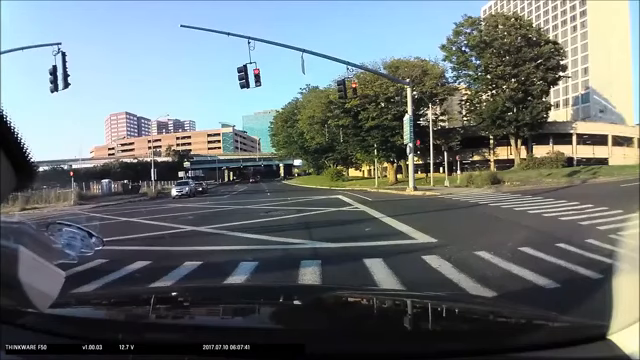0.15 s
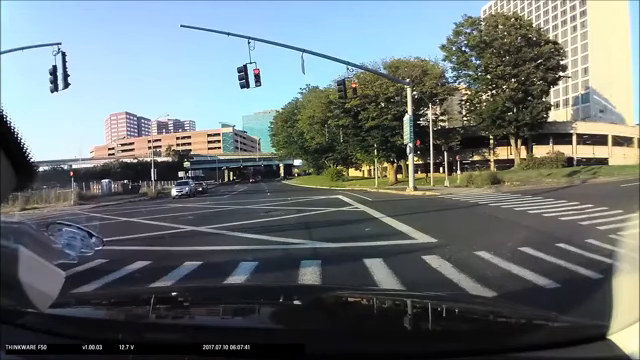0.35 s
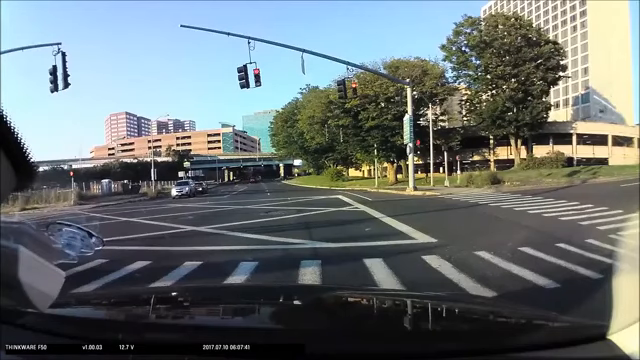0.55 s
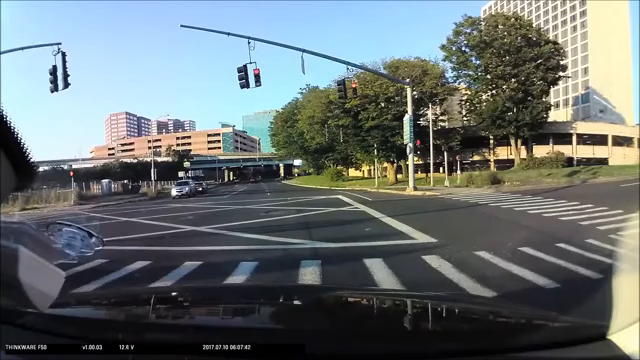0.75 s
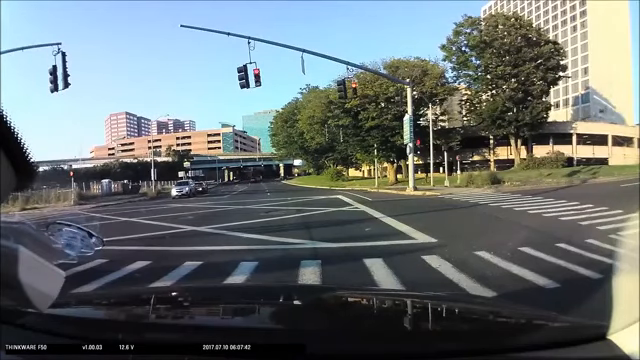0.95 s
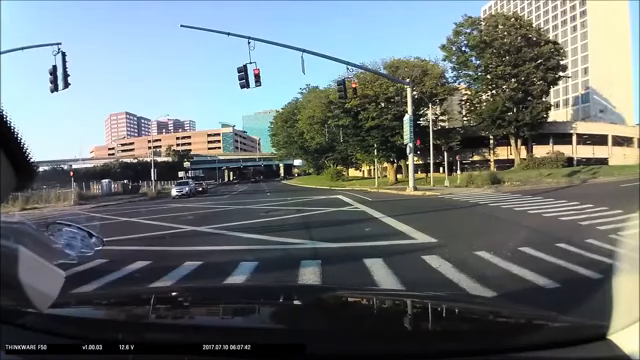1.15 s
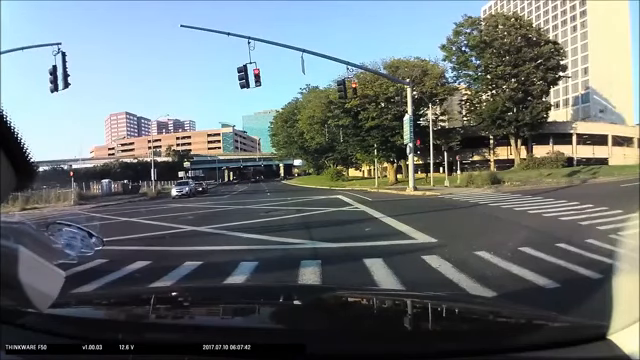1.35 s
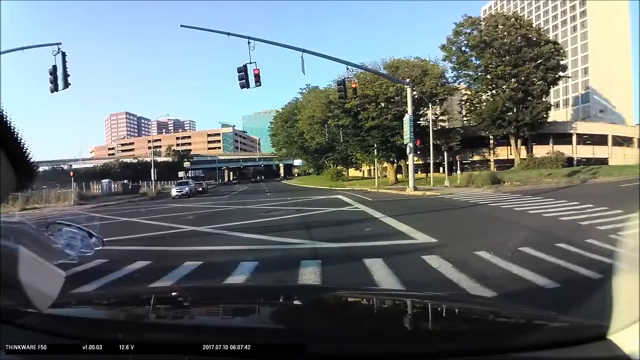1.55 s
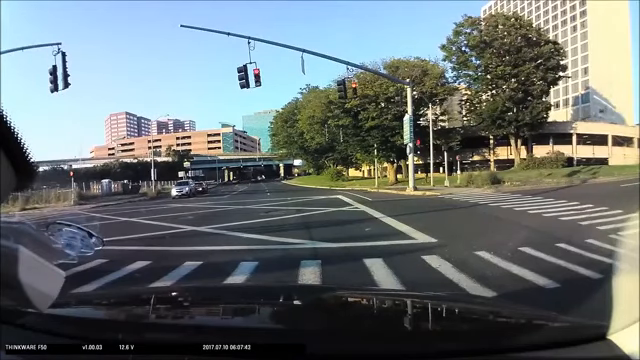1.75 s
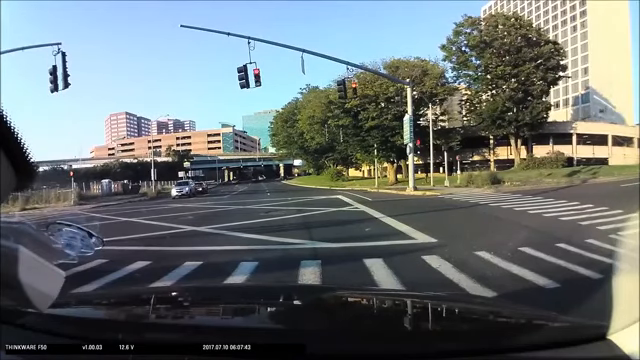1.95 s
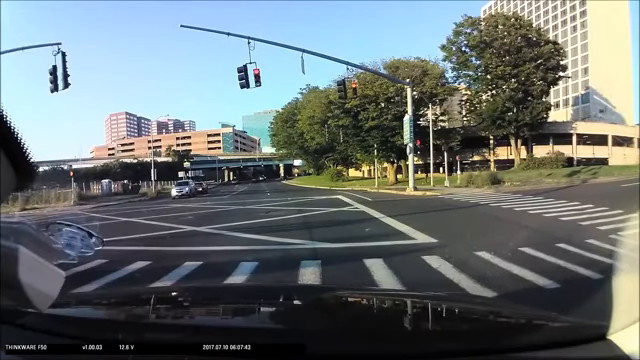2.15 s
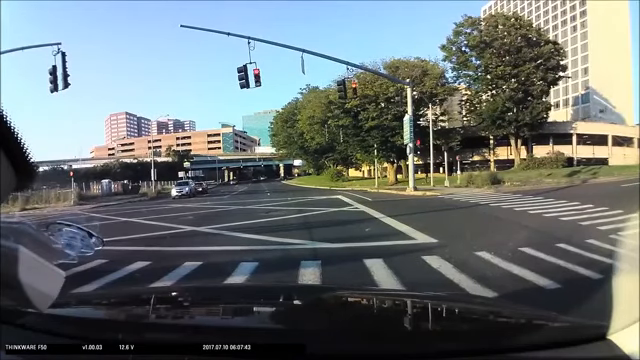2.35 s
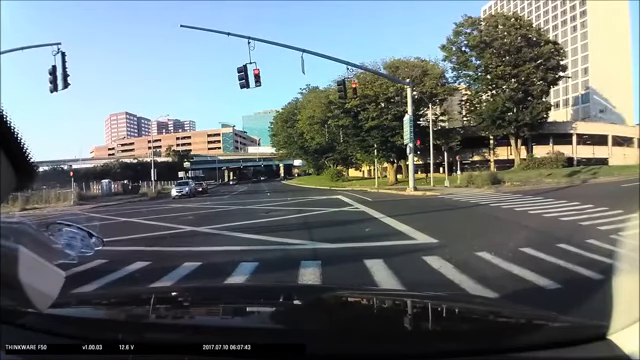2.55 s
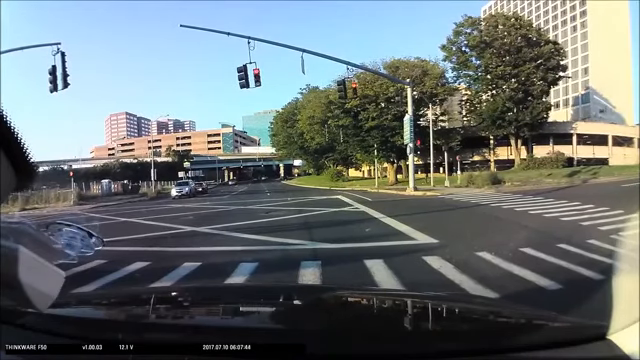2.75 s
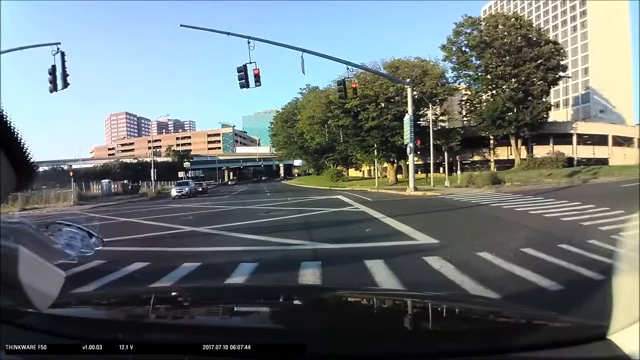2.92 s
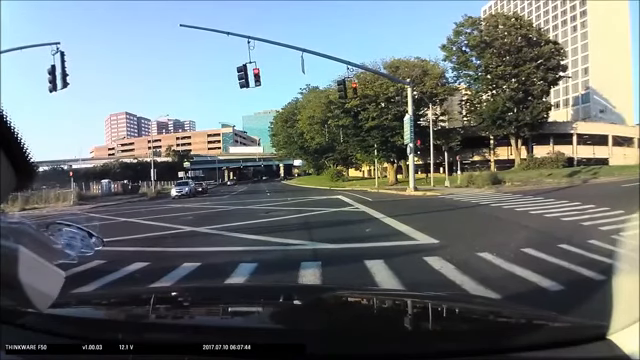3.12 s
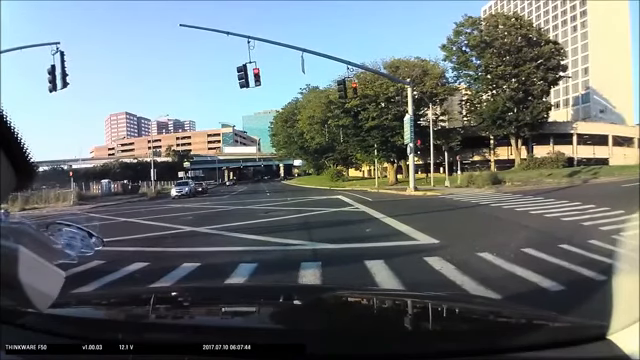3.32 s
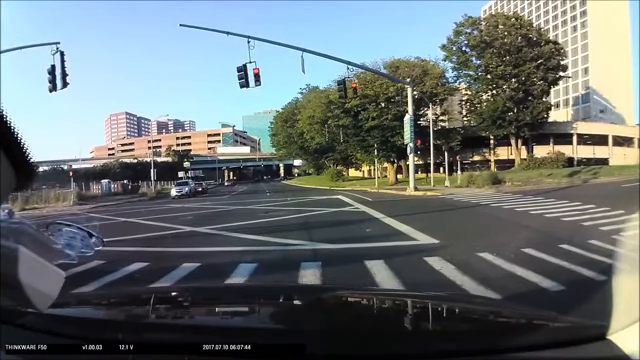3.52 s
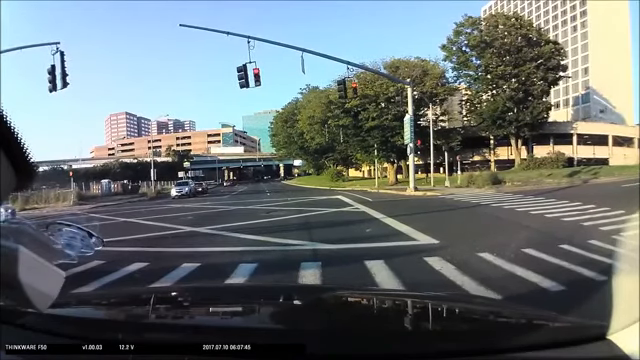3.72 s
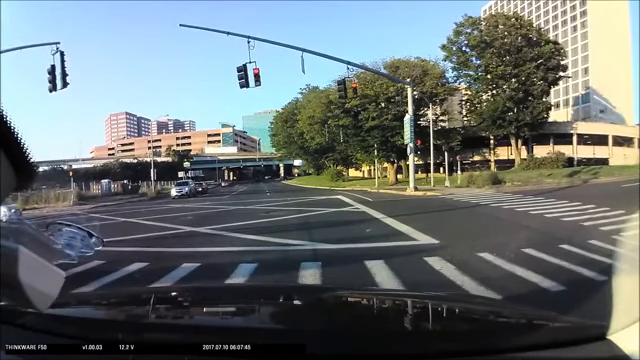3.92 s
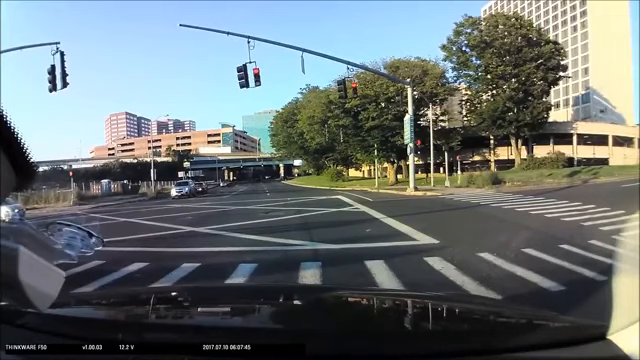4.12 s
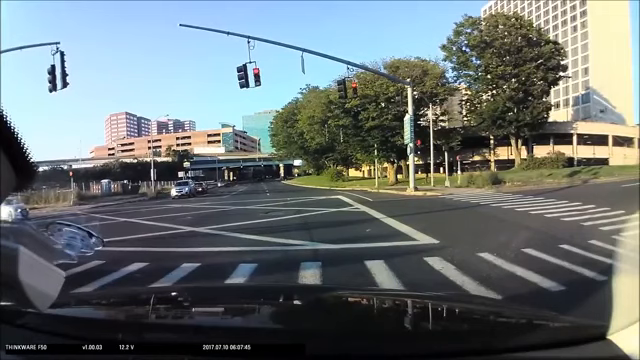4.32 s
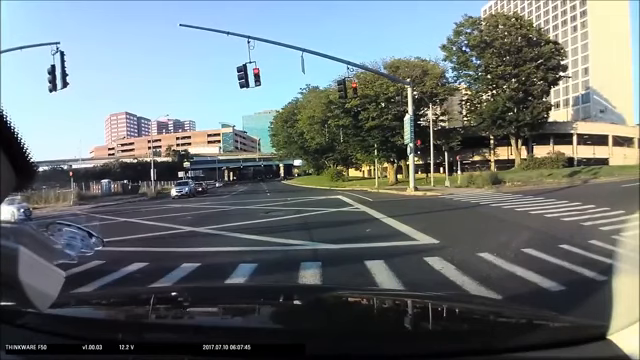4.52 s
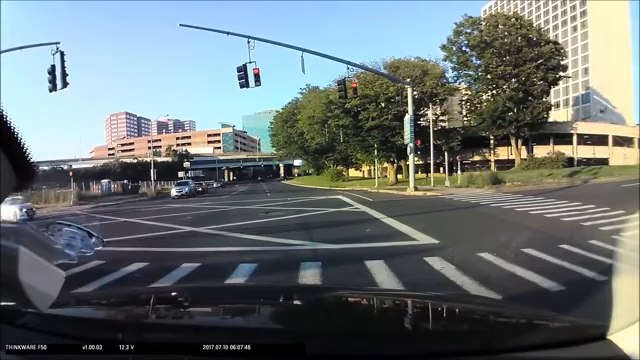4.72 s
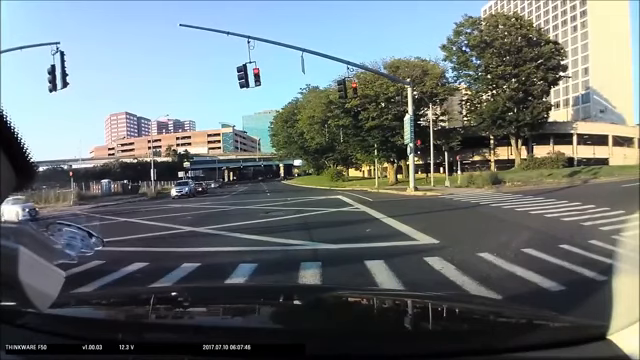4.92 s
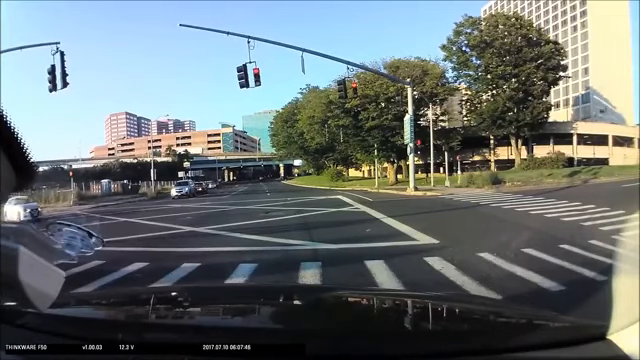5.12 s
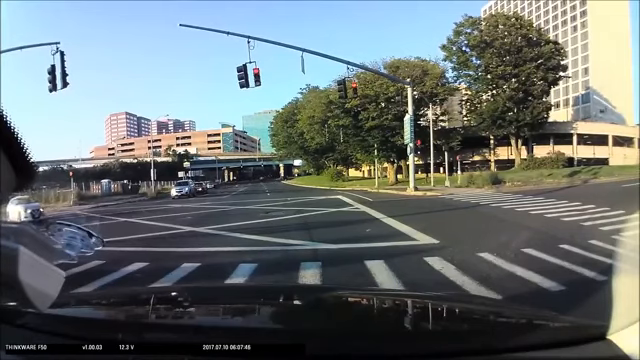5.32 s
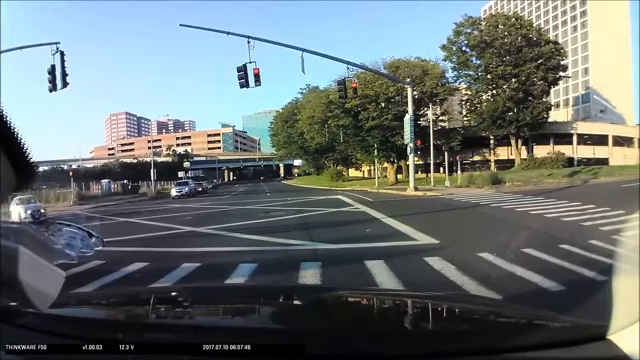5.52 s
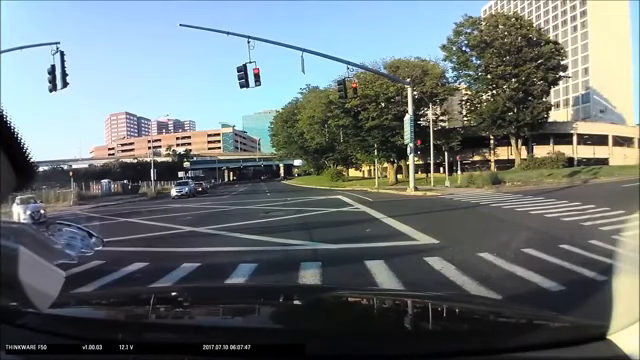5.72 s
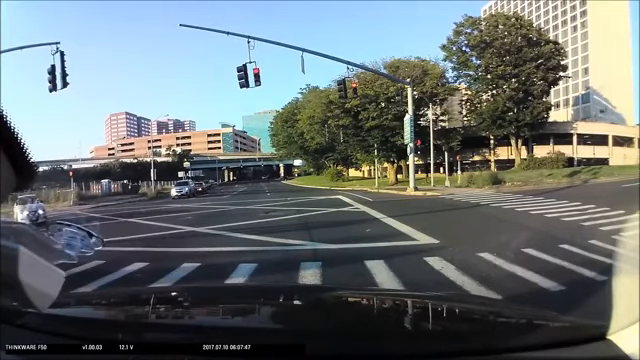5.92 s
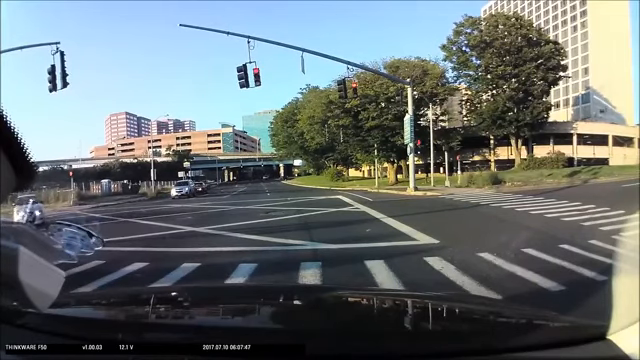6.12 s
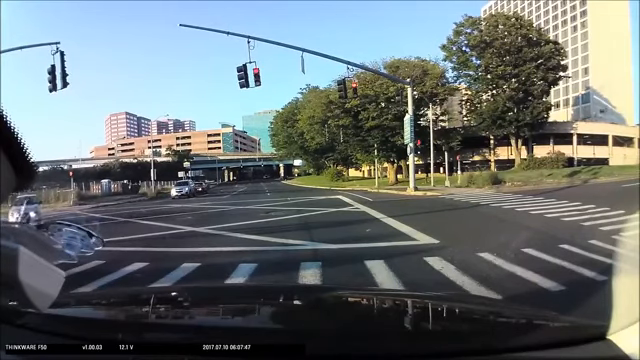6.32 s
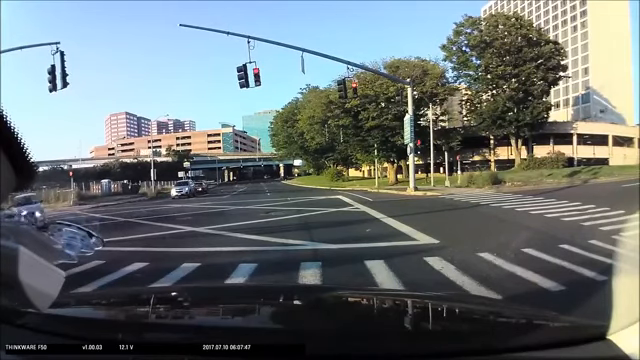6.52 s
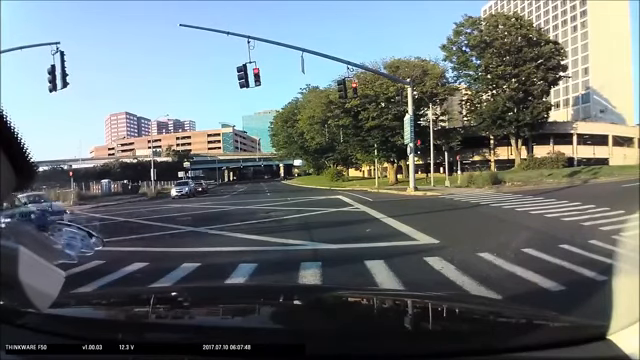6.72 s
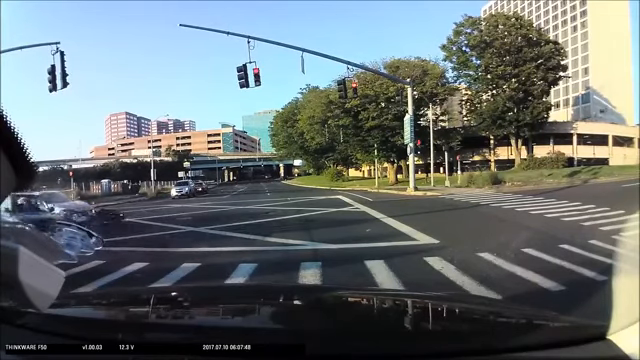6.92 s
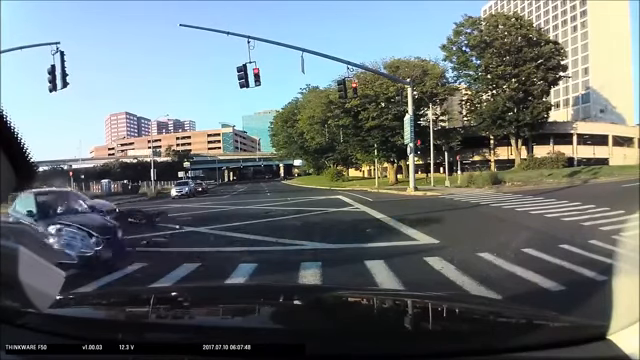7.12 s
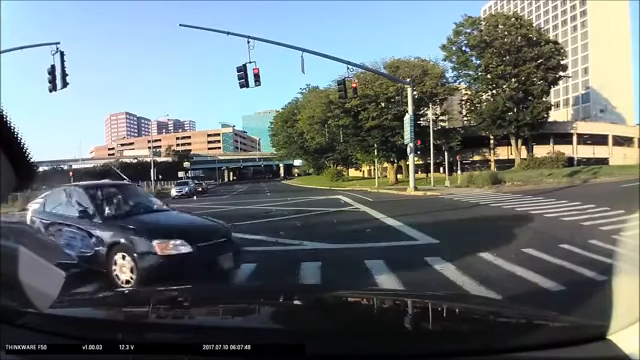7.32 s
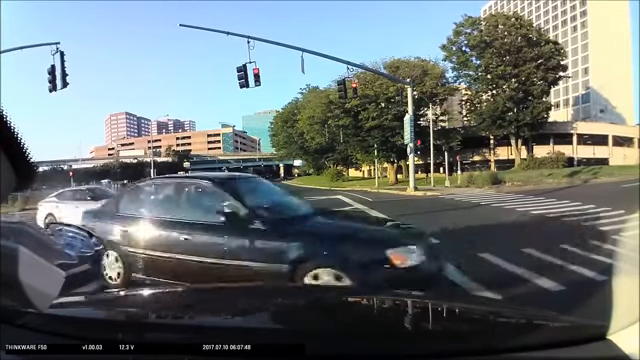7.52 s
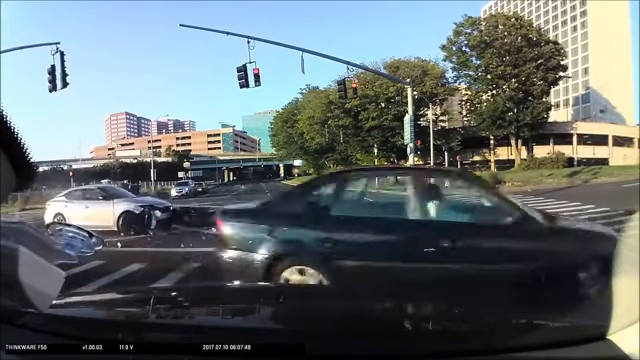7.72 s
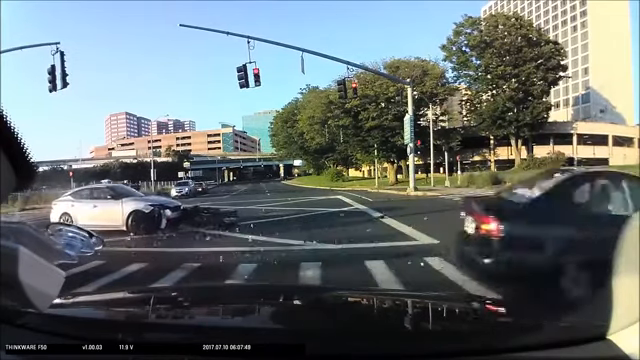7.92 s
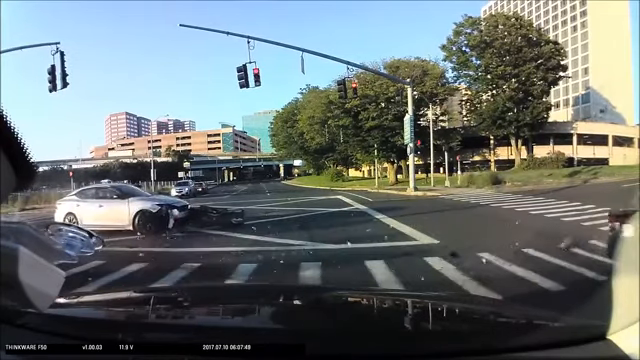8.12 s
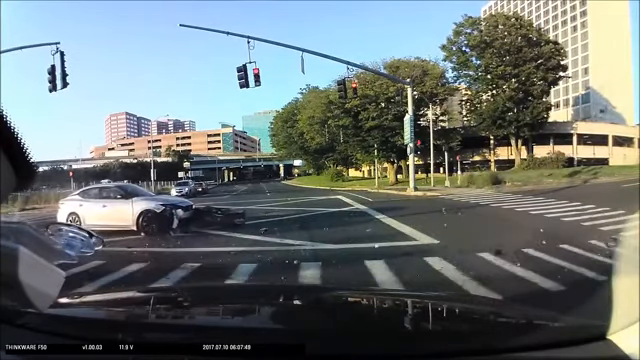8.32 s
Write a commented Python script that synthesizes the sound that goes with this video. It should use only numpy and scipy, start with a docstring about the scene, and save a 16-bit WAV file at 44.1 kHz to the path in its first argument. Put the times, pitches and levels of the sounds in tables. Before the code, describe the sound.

A car idles, heard from inside, until two cars crash just outside with squealing tyres, showering debris and a second crash.

```python
"""A crash heard from a waiting car

A car idles at a junction: its engine thumps, a fan blows, switches and the indicator tick.
Two cars collide just outside, crushing metal and plastic. One skids past on squealing tyres,
showers the windscreen with debris, jolts the waiting car and crashes again farther on.
A camera on the windscreen hears it all, coloured by the ringing of the glass and the cabin."""
import sys
import numpy as np
from scipy import signal
from scipy.fft import rfft, irfft, next_fast_len
from scipy.io import wavfile
from scipy.ndimage import map_coordinates

SR = 44100
rng = np.random.default_rng(int(sys.argv[2]) if len(sys.argv) > 2 else 0)


def pcm_store(signal):
    """Save signal as 16-bit PCM."""
    levels = np.round(np.clip(np.atleast_2d(signal), -1, 1) * 32767)
    wavfile.write(sys.argv[1], SR, levels.astype(np.int16).T)


N = 373086


def amp(db):
    """Turn decibels into a gain."""
    return 10 ** (np.asarray(db) / 20)


def unit(x):
    """Scale a sound to an average strength (rms) of 1."""
    return x / np.sqrt(np.mean(x ** 2) + 1e-20)


def clock():
    """The time of every sample, in seconds."""
    return np.arange(N) / SR


def curve(rows):
    """Join (time_s, value) points with straight lines."""
    return np.interp(clock(), *np.transpose(rows))


def wobble(rate):
    """A smooth random curve through `rate` new values a second."""
    values = rng.standard_normal(int(N * rate / SR) + 4)
    steps = np.arange(0, N, 8)
    return np.interp(np.arange(N), steps, map_coordinates(values, [steps * rate / SR]))


def swell(start_s, rise_s, hold_s, fall_db_per_s):
    """A gain that rises to 1, holds and dies away."""
    t = clock() - start_s
    return np.clip(t / rise_s, 0, 1) * amp(-fall_db_per_s * np.maximum(t - rise_s - hold_s, 0))


def drive_by(nearest_s, width_s):
    """A passing car is louder the nearer it is: a gain of 1 at its closest."""
    return 1 / np.hypot(1, (clock() - nearest_s) / width_s)


def tone(hz):
    """A pure tone that follows a pitch curve."""
    return np.sqrt(2) * np.sin(2 * np.pi * np.cumsum(hz) / SR)


def fuzzy_tone(hz, width_hz):
    """A narrow band of noise around one pitch."""
    phase = 2 * np.pi * hz * clock()
    return unit(wobble(width_hz) * np.sin(phase) + wobble(width_hz) * np.cos(phase))


def ring(modes, t):
    """An object struck at t = 0 rings; fade_s is always the time to fall by 60 dB."""
    t = np.maximum(t, 0)
    return sum(amp(db - 60 * t / fade_s) * np.sin(2 * np.pi * hz * t) for hz, db, fade_s in modes)


def grains(per_s, spread_db):
    """Tiny random clicks of uneven size."""
    size = amp(spread_db * np.clip(rng.standard_normal(N), -2, 2)) * rng.choice([-1, 1], N)
    return unit(size * (rng.random(N) < per_s / SR))


# pitches that the windscreen and cabin strengthen: pitch_hz, width_hz, boost_db
GLASS = [(259, 30, 4.5), (601, 50, 5), (890, 68, 4), (1660, 150, 7), (2626, 72, 5.5), (2872, 116, 5.5),
         (3084, 270, 7)]

def coloured(x, colour, glass=True):
    """Filter x by a colour (how strong each pitch is next to the others), and by the glass if asked."""
    size = 2 * next_fast_len((N + SR // 2) // 2)
    hz = np.fft.rfftfreq(size, 1 / SR)
    points_hz, points_db = np.transpose(colour)
    octave, points = np.log2(hz + 1), np.log2(points_hz)
    octaves_outside = abs(octave - np.clip(octave, points[0], points[-1]))
    db = np.interp(octave, points, points_db) - 24 * octaves_outside
    if glass:
        db += sum(boost / (1 + (2 * (hz - pitch) / width) ** 2) for pitch, width, boost in GLASS)
    # build the filter so that it rings after a hit, never before
    cepstrum = irfft(np.log(amp(db) + 1e-6))
    response = np.exp(rfft(2 * cepstrum[:size // 2], size) - cepstrum[0])
    return irfft(rfft(x, size) * response, size)[:N]


def noise(colour, glass=True):
    """Coloured noise of strength 1."""
    return unit(coloured(rng.standard_normal(N), colour, glass))


def clacks(hits, colour):
    """Hard hits, each a burst of noise that dies quickly."""
    t = clock()
    level = sum((t >= s) * amp(db - 60 * np.maximum(t - s, 0) / fade_s) for s, db, fade_s in hits)
    return level * noise(colour)


# colour of the microphone's hiss: pitch_hz, level_db
HISS = [(3500, -5.5), (5000, -10.5), (5700, -8.5), (6100, -3.5), (7200, 0), (8000, -7), (9000, 1),
        (10000, -1.5), (11100, 2.5), (11700, -9.5), (12500, -5.5), (13200, -10), (15000, -10)]
# steady electronic tones: pitch_hz, level_db
TONES = [(6002, -91), (6998, -88), (9001, -91), (10002, -89), (10998, -84)]
# path of a thin whine: time_s, pitch_hz
WHINE = [(0, 14000), (1.78, 13750), (2.1, 13450), (3.45, 13430), (4.2, 13900), (4.27, 13430)]

def electronics():
    """The camera's own circuits hiss and whine faintly."""
    tones = sum(amp(db) * tone(np.full(N, hz)) for hz, db in TONES)
    whine = amp(-86) * tone(curve(WHINE) + 18 * wobble(60))
    return amp(-70.5) * noise(HISS, glass=False) + tones + whine


# colour of the air in the cabin: pitch_hz, level_db
CABIN = [(20, -12), (60, 4), (130, -4), (200, -10), (280, -1), (400, -17.5), (700, -24), (1400, -26.5),
         (2100, -35.5), (3000, -34.5), (3800, -56)]
# bands of a faint whistle: pitch_hz, width_hz, relative_db
WHISTLE = [(1640, 200, 0), (2700, 150, -7.5)]

def cabin_air():
    """A steady hush fills the cabin, with a brief wavering whistle near the start."""
    bands = sum(amp(db) * fuzzy_tone(hz, width) for hz, width, db in WHISTLE)
    hush = amp(-52) * noise(CABIN, glass=False)
    whistling = swell(.18, rise_s=.35, hold_s=.75, fall_db_per_s=48)
    return hush + amp(-65.5 + 2.5 * wobble(11.6)) * whistling * bands


# colours of the fan's rumble and of air in the vents: pitch_hz, level_db
RUMBLE = [(11, -37.5), (18, 4), (39, -4.5), (113, -14), (155, -20.5), (197, -10.5), (299, -30), (329, -32),
          (500, -55), (650, -55), (1100, -120)]
VENT_RUSH = [(250, 0.5), (450, 3.5), (750, -4.5), (1200, -19), (2000, -27), (5000, -29.5)]
# puffs as the vents open: start_s, level_db
PUFFS = [(1.79, -63), (2.04, -61)]

def fan():
    """A low rumble swells as the fan pushes air through the vents."""
    blowing = swell(1.725, rise_s=.089, hold_s=2.68, fall_db_per_s=15)
    puffs = sum(amp(db) * swell(s, rise_s=.03, hold_s=.038, fall_db_per_s=55) for s, db in PUFFS)
    rumble = (amp(-51) + amp(-37) * blowing) * noise(RUMBLE, glass=False)
    rush = (amp(-72) * blowing + puffs) * noise(VENT_RUSH, glass=False)
    return rumble + rush


# colour of tyres heard through closed windows: pitch_hz, level_db
STREET = [(300, -5), (700, -7), (1000, 1), (1500, -4), (2000, -9.5), (2900, -5), (3300, -5.5), (3800, -31),
          (6000, -29)]

def traffic(distant_db=-74, nearest_db=-57):
    """Tyres hum far away while one car draws near on the cross street."""
    approach = amp(nearest_db) * drive_by(nearest_s=6.66, width_s=.49)
    return np.hypot(amp(distant_db), approach) * noise(STREET)


# deep notes: start_s, length_s, first_hz, last_hz, level_db
DRONES = [(1.802, 0.19, 55.9, 47.1, -35), (2.018, 1.06, 26, 33.92, -31), (3.54, 0.65, 55.7, 55.5, -41.5),
          (4.384, 0.38, 47.7, 42.1, -45.5), (4.424, .22, 109.5, 107.2, -45.5),
          (7.977, 0.14, 30.24, 30, -27)]

def drone(rise_s=.079, waver_db=1.5):
    """A deep drone comes and goes, each note sliding a little in pitch."""
    drift = 1 + .0401 * wobble(14)
    notes = np.zeros(N)
    for s, length_s, first_hz, last_hz, db in DRONES:
        hz = np.interp(clock(), [s, s + length_s], [first_hz, last_hz]) * drift
        notes += amp(db) * swell(s, rise_s, length_s - rise_s, fall_db_per_s=130) * tone(hz)
    return amp(waver_db * wobble(8.2)) * notes


# engine speed: time_s, turns_per_minute
IDLE = [(0.0, 715.3), (1.4, 719.3), (2.0, 708.2), (2.9, 711.2), (3.4, 723.3), (4.8, 720.9), (5.5, 713.1),
        (8.46, 711.6)]
# when each cylinder fires: fraction_of_cycle, relative_db
CYLINDERS = [(0.182, -10), (.475, -3), (0.702, -8), (.985, -8.5)]
# dashboard buzz after a firing: pitch_hz, relative_db, peak_s
DASHBOARD = [(197.9, -33, .019), (209.7, -38.5, 0.011), (256.5, -43, 0.019), (330.5, -51, 0.034),
             (427, -72, 0.032)]
# body boom after a firing: pitch_hz, relative_db, fade_s
BODY_BOOM = [(24, -70, 0.13), (51.4, -37.5, 0.13), (72, -45, 0.092), (106.2, -39.5, 0.14)]

def engine(scatter_db=2.26, boom_lead_s=.01144):
    """Four uneven cylinders thump the car's body and set the dashboard buzzing."""
    cycles = np.cumsum(curve(IDLE)) / (120 * SR)  # one cycle is two turns
    firings = np.zeros(N)
    for place, db in CYLINDERS:
        at = np.flatnonzero(np.diff(np.floor(cycles - place)))
        firings[at] += amp(db + scatter_db * rng.standard_normal(len(at)))
    t = np.arange(SR // 3) / SR
    # the panels take a moment to swell
    buzz = sum(amp(db) * (t / peak_s * np.exp(1 - t / peak_s)) ** 3 * np.sin(2 * np.pi * hz * t)
               for hz, db, peak_s in DASHBOARD)
    # the body feels each firing a little earlier, and more evenly
    thumps = np.roll(np.sqrt(firings), -int(boom_lead_s * SR))
    return signal.fftconvolve(firings, buzz)[:N] + signal.fftconvolve(thumps, ring(BODY_BOOM, t))[:N]


# switch clicks and thinner, brighter snaps: start_s, relative_db, fade_s
CLICKS = [(1.812, -49, 0.21), (1.978, -54.5, 0.25), (2.059, -60, 0.16), (4.176, -41, 0.092),
          (4.255, -54, 0.09)]
SNAPS = [(1.8, -49, .025), (2.26, -58, .03)]
# colours of hard plastic and of bright hits on glass, shared with the debris: pitch_hz, level_db
PLASTIC = [(200, 0), (500, 15), (1400, 3), (2500, -3.5), (3200, 1), (4000, -10.5), (5000, -5.5),
           (6500, -16), (12000, -59)]
SHARDS = [(300, 3), (700, 1.5), (1600, 5.5), (2200, -3.5), (3100, -1), (4200, -4), (6000, -6.5),
          (8000, -16.5), (11000, -12.5), (13000, -27), (15000, -42)]

def switches():
    """Hard plastic switches click and snap in the cabin."""
    return amp(-3) * (clacks(CLICKS, PLASTIC) + clacks(SNAPS, SHARDS))


# ticks of the indicator's relay, an electric switch: start_s, relative_db, fade_s
RELAY_TICKS = [(4.4653, -49, 0.12), (4.8693, -49, 0.1), (5.263, -47.5, 0.38), (5.661, -45.5, 0.072)]
# colour of a tick: pitch_hz, level_db
RELAY_COLOUR = [(500, -3), (1200, -2.5), (1550, 4), (2300, -14), (3200, -14), (4000, -18), (5300, -13),
                (6300, -18), (9000, -32)]
# ringing of the relay's frame: pitch_hz, relative_db, fade_s
RELAY_FRAME = [(1550, -16, 0.1), (3110, -10, 0.057), (5340, -17, .05)]

def indicator():
    """The relay ticks, and each tick rings its little frame."""
    blows = np.zeros(N)
    for s, db, _ in RELAY_TICKS:
        blows[round(s * SR)] = amp(db)
    frame = signal.oaconvolve(blows, ring(RELAY_FRAME, np.arange(SR // 4) / SR))[:N]
    return amp(-4) * clacks(RELAY_TICKS, RELAY_COLOUR) + frame


# showers of small fragments: peak_s, relative_db
SHOWERS = [(7.268, -45.5), (7.312, -49.5), (7.355, -41.5), (7.434, -47.5), (7.58, -53), (7.64, -40.5),
           (8.27, -51)]
# sharp pieces on the glass and heavier ones on the bonnet: start_s, relative_db, fade_s
GLASS_HITS = [(7.221, -46, 0.07), (7.3537, -38, 0.062), (7.4165, -30, 0.059), (7.4246, -32, 0.046),
              (7.4899, -45, 0.11), (8.0524, -46, 0.1), (8.4413, -35.5, 0.077)]
BONNET_HITS = [(7.326, -30, 0.08), (7.426, -28, 0.058), (7.578, -38.5, 0.15), (7.626, -27, 0.042),
               (7.639, -34.5, 0.062), (7.76, -44.5, 0.14), (7.92, -47, 0.21), (8.188, -37, 0.077)]

def debris(rise_db_per_s=420, fall_db_per_s=477):
    """Fragments shower the windscreen and trickle on; bigger pieces hit the glass and the bonnet."""
    t = clock()
    showers = sum(amp(db - np.maximum(rise_db_per_s * (s - t), fall_db_per_s * (t - s)))
                  for s, db in SHOWERS)
    patter = amp(4.5) * showers * unit(coloured(grains(per_s=2500, spread_db=3), SHARDS))
    dropping = swell(7.14, rise_s=.077, hold_s=1.3, fall_db_per_s=60)
    trickle = amp(-63) * dropping * unit(coloured(grains(per_s=600, spread_db=1), SHARDS))
    return patter + trickle + clacks(GLASS_HITS, SHARDS) + amp(-3) * clacks(BONNET_HITS, PLASTIC)


# squealing blocks of tyre tread: pitch_ratio, relative_db
TREADS = [(0.929, -9), (0.999, -2), (1.1, -7.5), (1.95, -12)]

def tyre_squeal(low_hz=895, high_hz=1125, swing_s=7.06, swing_width_s=.0593):
    """Locked tyres stick and slip in a rasping squeal that climbs as the car swings round."""
    swing = (1 + np.tanh((clock() - swing_s) / swing_width_s)) / 2
    hz = low_hz + (high_hz - low_hz) * swing
    treads = sum(amp(db + 3 * wobble(70)) * tone(hz * ratio * (1 + .032 * wobble(200)))
                 for ratio, db in TREADS)
    rasp = fuzzy_tone(1634, width_hz=110)
    squealing = swell(6.74, rise_s=.15, hold_s=.23, fall_db_per_s=120)
    return squealing * (amp(-40) * treads + amp(-44) * rasp)


def lingering():
    """The gain of the noise that the skidding car leaves behind it."""
    return swell(7.2, rise_s=.15, hold_s=1.5, fall_db_per_s=20)


# colour of rubber scraping the road: pitch_hz, level_db
SCRUB = [(300, -9), (550, -11), (750, -3), (1000, 3), (1500, -5), (2000, -8.5), (2900, -5.5), (3300, -3.5),
         (3800, -17.5), (6000, -32)]

def tyre_scrub(slide_db=-41, roll_db=-53.5):
    """The tyres scrape roughly over the road, then roll on."""
    sliding = swell(6.74, rise_s=.059, hold_s=.61, fall_db_per_s=120)
    friction = np.hypot(amp(slide_db) * sliding, amp(roll_db) * lingering())
    return friction * amp(2 * wobble(55)) * noise(SCRUB)


# short squeaks: peak_s, pitch_hz, relative_db, length_s
SCREECHES = [(2.718, 3040, -67.5, 0.29), (3.236, 2610, -72, 0.13), (3.226, 3170, -70.5, 0.11),
             (6.783, 1570, -33, 0.034), (6.854, 2530, -34, 0.022), (6.891, 2503, -30, 0.025),
             (6.902, 905, -34, 0.02), (7.035, 1560, -34, 0.023), (7.352, 3710, -43.5, 0.043),
             (7.353, 2640, -39, 0.028), (7.365, 3180, -37, 0.037), (7.594, 2920, -38.5, 0.013)]

def screeches():
    """Brakes, metal and rubber squeak in short bursts of unsteady pitch."""
    t = clock()
    waver = 1 + .024 * wobble(400)
    return amp(-1) * sum(amp(db) * np.exp(-2 * ((t - s) / length_s) ** 2) * tone(hz * waver)
                         for s, hz, db, length_s in SCREECHES)


# colour of the exhaust's roar, shared with the boom of the crashes: pitch_hz, level_db
ROAR = [(11, -33), (18, 5.5), (38, -2.5), (97, -15), (134, -9.5), (166, -19.5), (219, -22), (297, -31),
        (362, -32), (700, -38.5), (910, -61), (1540, -120)]
# the waiting car's body when jolted: pitch_hz, level_db, fade_s
JOLT = [(43.6, -3.5, 0.18), (86, -8, 0.108), (133, -18, 0.075)]

def passing_car(jolt_s=7.313, jolt_rise_s=.0041):
    """After the first crash a car roars past, jolts the waiting one and drags a slow air wave along."""
    t = clock()
    passing = drive_by(nearest_s=7.39, width_s=.094) * (t > CRASHES[0][0])
    roar = np.hypot(amp(-23.5) * passing, amp(-28) * lingering()) * noise(ROAR, glass=False)
    jolt = ring(JOLT, t - jolt_s) * np.clip((t - jolt_s) / jolt_rise_s, 0, 1)
    air_wave = -amp(-14) * np.sin(2 * np.pi * np.clip((t - 7.355) / .2, 0, 1))  # one pull, one push
    return roar + jolt + air_wave


def loose_metal(start_s, per_s, fade_s, spread_db):
    """Loose metal pieces are struck at random, each ringing briefly at a pitch of its own."""
    first = int(start_s * SR)
    count = int(per_s * (N - first) / SR)
    when, pitch, strength = np.hsplit(rng.random((count, 3)), 3)
    starts = first + (when * (N - first)).astype(int)
    hz = 400 * 12 ** pitch  # 400 to 4800 Hz
    t = np.arange(SR // 10) / SR
    rings = amp(spread_db * strength - 60 * t / fade_s) * np.sin(2 * np.pi * hz * t) * np.sqrt(hz)
    return np.bincount((starts + np.arange(len(t))).ravel(), rings.ravel(), N)[:N]


# car bodies strike: start_s, rise_s, crush_s, crunch_relative_db, thud_relative_db
CRASHES = [(6.671, 0.03, 0.048, -22.5, -23), (7.26, 0.024, 0.097, -41, -39),
           (8.212, 0.037, 0.021, -28.5, -27.5), (8.3, .03, .02, -50, -40), (8.442, 0.019, .02, -29.5, -20)]
# colours of the crunch and the thud: pitch_hz, level_db
CRUNCH = [(200, -5.5), (400, -4), (550, -3.5), (780, -4), (1100, -3.5), (1600, -10.5), (2150, -11),
          (2900, -5), (3300, -5.5), (3650, -17), (4400, -19.5), (5300, -32), (6500, -33), (7500, -53),
          (12000, -68)]
THUD = [(20, -11), (35, -5), (80, 1), (125, -2.5), (190, -6.5), (255, -4), (330, -16), (420, -11),
        (500, -17), (700, -30.5)]

def collisions(rattle_db=-5.5, crack_db=-1, metal_db=-6, boom_db=-7):
    """Panels buckle, plastic cracks and loose metal rings over the thud and boom of the two cars."""
    crushing, thudding = np.zeros(N), np.zeros(N)
    for s, rise_s, crush_s, crunch_db, thud_db in CRASHES:
        # the crunch stops fast and leaves a rattle; the thud hangs on
        crush = swell(s, rise_s, crush_s, fall_db_per_s=412)
        rattle = amp(rattle_db) * swell(s, rise_s, crush_s, fall_db_per_s=91)
        crushing += amp(crunch_db) * np.maximum(crush, rattle)
        thudding += amp(thud_db) * swell(s, rise_s, crush_s, fall_db_per_s=110)
    buckling = grains(per_s=4000, spread_db=1.5) * amp(wobble(110))
    cracks = unit(coloured(buckling, CRUNCH))
    metal = coloured(loose_metal(start_s=6.6, per_s=500, fade_s=.14, spread_db=14), CRUNCH)
    crunch = amp(crack_db) * cracks + amp(metal_db) * metal / np.std(metal[-SR:])
    thud = noise(THUD) + amp(boom_db) * noise(ROAR, glass=False)
    return crushing * crunch + thudding * thud


def scene():
    """All the sounds meet at one microphone."""
    waiting = engine() + fan() + traffic() + cabin_air() + drone() + switches() + indicator()
    crash = collisions() + tyre_squeal() + tyre_scrub() + screeches() + passing_car() + debris()
    return (waiting + crash + electronics())[None]


def record(dry, ceiling=.48, top_hz=15000):
    """The jolt overloads the microphone, which squashes it; the camera cuts off the highest treble."""
    squashed = dry / (1 + (dry / ceiling) ** 6) ** (1 / 6)
    size = next_fast_len(N + SR // 2)
    kept = np.fft.rfftfreq(size, 1 / SR) < top_hz
    return irfft(rfft(squashed, size) * kept, size)[:, :N]


dry = scene()
out = record(dry)
pcm_store(out)
```